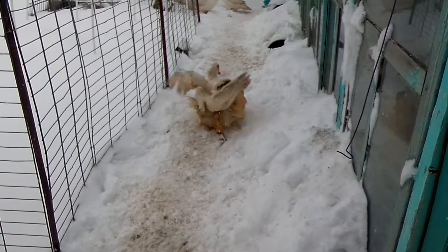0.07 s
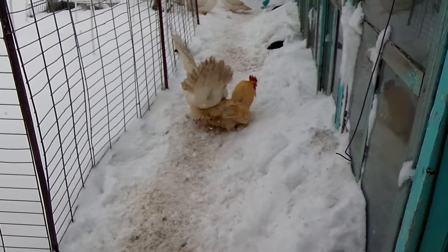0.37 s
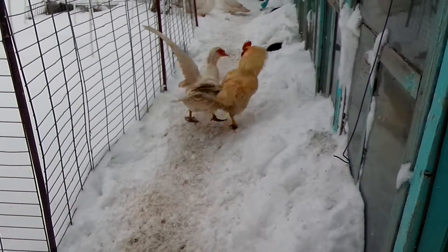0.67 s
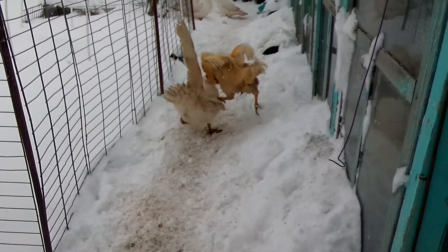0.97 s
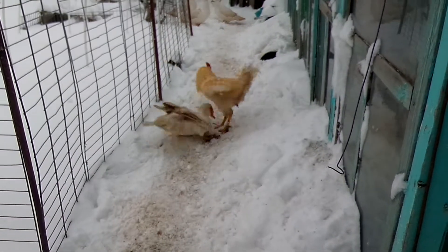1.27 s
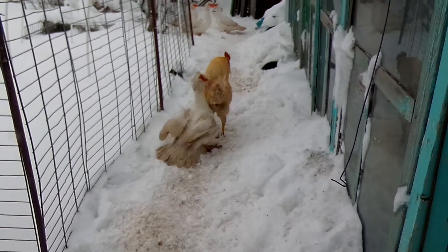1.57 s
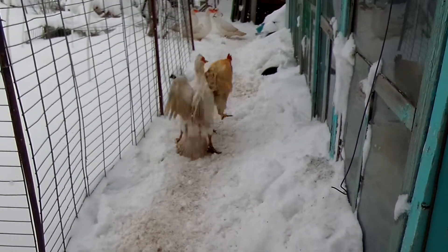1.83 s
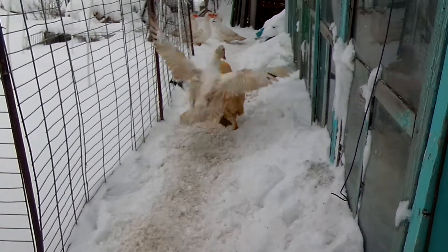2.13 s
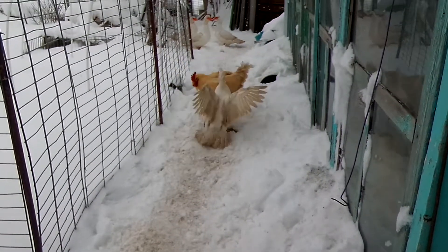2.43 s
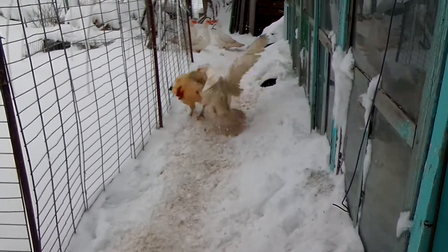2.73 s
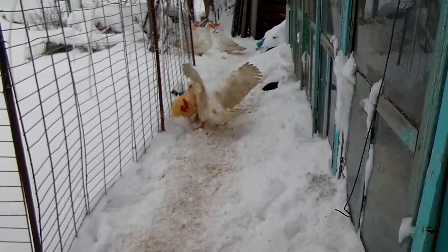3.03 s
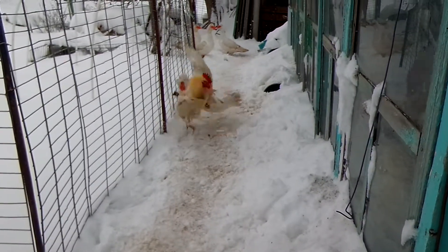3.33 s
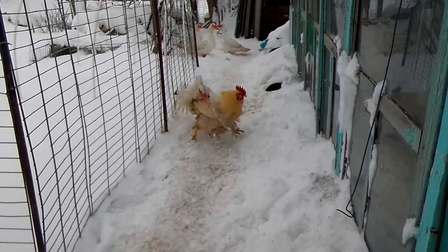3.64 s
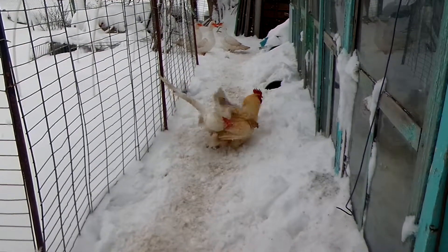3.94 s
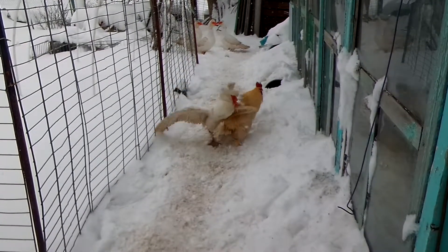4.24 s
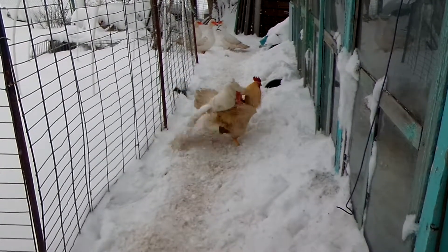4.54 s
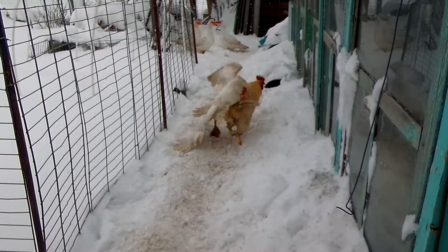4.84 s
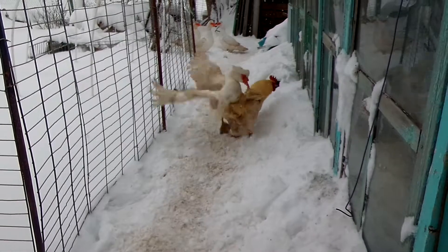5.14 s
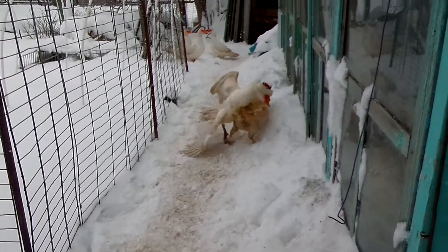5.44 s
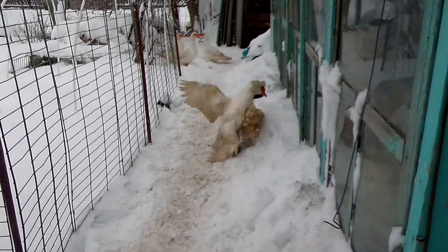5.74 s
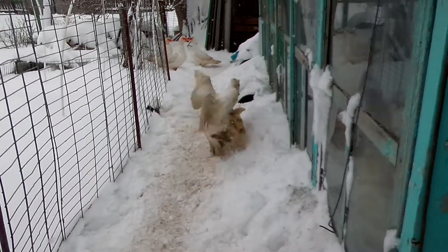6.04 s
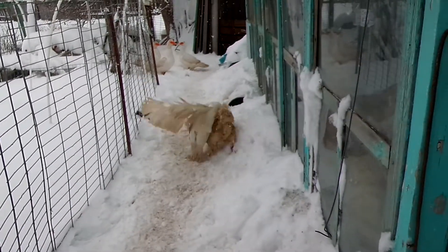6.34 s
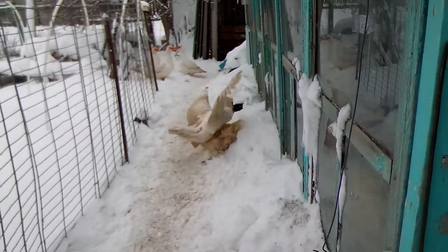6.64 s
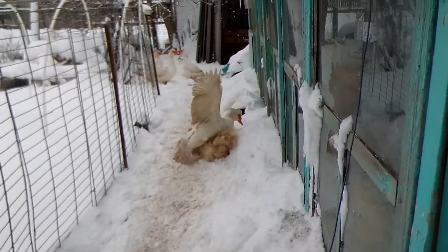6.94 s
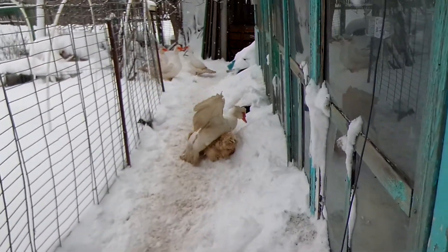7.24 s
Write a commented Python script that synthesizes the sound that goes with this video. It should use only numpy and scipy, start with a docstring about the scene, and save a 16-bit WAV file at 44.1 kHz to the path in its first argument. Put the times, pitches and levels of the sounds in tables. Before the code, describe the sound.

A drake and a rooster scuffle on snow, wings flapping and slapping, stiff feathers snapping and rustling in uneven bursts.

```python
"""A drake and a rooster fight on packed snow in a narrow pen, between a wire fence and a shed.
A first light blow breaks the near silence of the winter yard; feet stamp and the drake hisses softly.
From about 2 s the bouts come fast: stiff quills rake and snap across the other bird, wings land with
dull slaps and pushes of air, and feathers rustle and snow crunches in between. A deep handling rumble
swells near 6 s, the last hit falls as a soft distant wash rises, and the drake gives one more hiss."""
import sys
import numpy as np
from scipy import signal
from scipy.fft import rfft, irfft
from scipy.io import wavfile
from scipy.ndimage import uniform_filter1d

SR = 44100
rng = np.random.default_rng(int(sys.argv[2]) if len(sys.argv) > 2 else 0)


def bounce(signal):
    """Save signal as a 16-bit WAV file at the path given by the first command-line argument."""
    frames = np.transpose(np.atleast_2d(signal))
    limited = np.clip(frames, -1, 1)
    pcm = np.round(limited * 32767).astype(np.int16)
    wavfile.write(sys.argv[1], SR, pcm)


N = 330750
TIME = np.arange(N) / SR

# Quills raking a body: t/s, attack/s, release start/s, level/dB, rate/(quills/s),
# vane hiss re the clicks/dB, tilt/(dB/octave), shaft resonance f/Hz, its boost/dB
QUILL_RAKES = [(0.064, 0.004, .010, -39, 750, -2, 0, 5700, 3.5),
               (1.871, 0.0038, 0.045, -31, 237, 0, -0.5, 1540, 2.5),
               (2.089, .001, 0.036, -32.5, 240, 6, -1.25, 6060, 5.5),
               (2.592, .001, 0.0041, -46, 390, 1, 3, 2000, 17),
               (3.362, 0.0063, 0.027, -43, 200, 6, 3.5, 2850, 16.5),
               (3.686, 0.0036, 0.025, -53.5, 142, -8, -8, 2640, 12),
               (3.774, .008, 0.072, -50.5, 210, 3, 0, 2800, 12),
               (4.011, 0.022, 0.047, -30.5, 483, -1.5, 1.5, 4670, 3),
               (4.067, .002, 0.033, -49, 250, 10, -2.5, 1550, -14),
               (4.371, 0.04, 0.036, -44, 247, -22, 4.5, 1090, 9),
               (4.805, .014, 0.028, -50.5, 280, 0, 1, 5700, 3),
               (5.094, 0.012, 0.041, -30, 300, -3, -1, 4070, 0.5),
               (6.4418, 0.001, 0.0024, -37.5, 660, -6, 0.5, 2570, 25)]
# Single quills and claws snapping: t/s, peak/dB, shaft resonance f/Hz, its boost/dB
QUILL_SNAPS = [(1.9048, -15, 5000, 0), (1.9136, -18, 4000, 10.5), (1.951, -25, 8000, 2),
               (2.0197, -17.5, 5730, 15.5), (2.022, -13, 6500, 10), (2.09, -19, 4000, 18),
               (2.1183, -26, 6000, 2), (2.356, -42.5, 7600, 5), (2.576, -32, 2500, 17),
               (2.7105, -40.5, 5540, 13), (2.9252, -47, 6030, 6), (3.064, -43, 7700, 8),
               (3.342, -32, 5500, 3), (3.353, -22, 5400, 2.5), (3.375, -24.5, 4060, 12.5),
               (3.3944, -26.5, 5500, 4), (3.409, -32, 3000, 4), (3.4288, -33.5, 5500, -7),
               (3.532, -37.5, 6040, -2), (3.5933, -37, 2960, 26), (3.688, -29.5, 7460, 9),
               (3.7136, -25.5, 2800, -8), (3.737, -34, 5500, 9), (3.791, -28.5, 4500, 15),
               (3.868, -39, 6040, 2), (3.963, -39, 5000, -1), (4.049, -16.5, 5000, -2),
               (4.0834, -23, 9100, 12), (4.1025, -22.5, 4500, 5), (4.362, -32, 5000, -3),
               (4.388, -27, 5700, 4), (4.838, -35.5, 5660, 0), (5.0924, -24, 4450, 6),
               (5.14, -33, 9000, -2.5), (6.4464, -21, 5900, 9.5)]
# Wings landing on a body: t/s, level/dB, t60/s, knock f/Hz, its boost/dB
WING_SLAPS = [(.067, -51, 0.1, 980, 31), (0.071, -60.5, 0.27, 241, 33), (1.98, -48.5, 0.41, 400, -5),
              (2.022, -31.5, 0.038, 470, 10), (2.161, -45, 0.18, 405, -1), (2.5759, -33, 0.04, 840, 13.5),
              (2.595, -37.5, 0.044, 1220, 8), (2.711, -42.5, 0.074, 206, 9), (2.748, -49, 0.062, 1190, 10),
              (2.792, -39.5, 0.029, 230, 9.5), (3.079, -40, 0.034, 222, 0), (3.797, -38.5, 0.037, 1400, 4),
              (4.059, -26, 0.033, 1320, 13.5), (4.066, -36.5, 0.061, 197, 11),
              (4.399, -36.5, 0.063, 580, -9), (4.410, -30.5, 0.041, 1070, 10),
              (4.816, -38.5, 0.044, 442, 7.5), (4.8373, -35, 0.059, 388, -9), (5.027, -51, 0.27, 700, 0),
              (5.112, -33, 0.079, 342, 24), (6.052, -47.5, 0.25, 500, 13), (6.235, -48, 0.13, 700, -5),
              (6.26, -48, 0.16, 403, 2), (6.444, -34, 0.11, 1100, 0)]
# Feet stamping on packed snow: t/s, level/dB, knock f/Hz
STAMPS = [(0.203, -50.5, 1030), (.721, -56.5, 400), (0.817, -59, 607), (.884, -62, 553), (.98, -61, 1010),
          (1.491, -61, 1080), (2.255, -47, 347), (2.438, -57.5, 400), (2.652, -46.5, 450),
          (3.512, -51.5, 460), (3.962, -53, 806), (5.709, -52, 290), (5.851, -53.5, 1280),
          (6.765, -52, 198)]
# Wing strokes: t/s, air push level/dB, push f/Hz, swish level/dB, rustle level/dB
WING_STROKES = [(0.676, -44.5, 32.6, -67, -74), (1.905, -40, 85.5, -52, -57), (2.03, -39, 52.7, -50, -51),
                (2.115, -44.5, 54, -54.5, -47), (2.258, -43, 88, -60, -64), (2.608, -40, 77, -51, -52.5),
                (2.716, -39.5, 68, -51.5, -57), (2.794, -41, 95, -65, -55.5), (3.085, -40.5, 55, -62, -69),
                (3.391, -59, 102, -53, -47.5), (3.6, -52, 95.5, -54.5, -59.5), (3.785, -48, 90, -61.5, -67),
                (4.07, -35.5, 89, -46, -47.5), (4.422, -31.5, 84, -53, -59), (4.847, -32, 80.4, -50.5, -57),
                (5.127, -31.5, 183, -52, -55), (5.948, -54, 85.5, -55, -59),
                (6.056, -37, 80.4, -45.5, -55.5), (6.138, -50, 50, -61, -60), (6.263, -42, 70, -51, -58.5),
                (6.445, -33, 76, -50, -62)]
# Plumage brushing plumage: t/s, level/dB, half length/s
PLUMAGE_BRUSHES = [(0.095, -60.5, 0.022), (.19, -69, 0.025), (0.485, -73, 0.032), (1.135, -71.5, 0.0088),
                   (1.296, -67, 0.012), (1.6, -69.5, .01), (1.784, -57.5, 0.058), (2.284, -64.5, 0.054),
                   (2.65, -61, 0.017), (3.116, -61, 0.027), (3.416, -56, .01), (3.533, -61, 0.036),
                   (3.703, -52, 0.045), (3.821, -54.5, 0.042), (4.32, -58.5, 0.0087), (4.393, -50.5, 0.018),
                   (5.055, -66, 0.045), (5.303, -64.5, .025), (5.43, -60, 0.026), (5.661, -58, 0.052),
                   (6.767, -71, .03), (7.49, -73, 0.018)]
# Feet scraping the snow crust: t/s, level/dB, half length/s
SNOW_SCRAPES = [(2.94, -71.5, 0.081), (3.72, -53, 0.036), (3.834, -56.5, 0.041), (6.08, -70.5, 0.25)]
# The drake's hisses: centre t/s, half length/s, level/dB, formant scale/ratio, glide/(octaves/s),
# tilt/(dB/octave)
DRAKE_HISSES = [(0.253, 0.06, -68, 1.1, 1.8, -1), (1.057, 0.03, -71, 1.3, 0.46, 1),
                (1.767, 0.047, -55, 1, -.2, 2), (7.214, 0.054, -66, 1, .3, -0.5)]
# Resonances of throat and bill: f/Hz, width/Hz, level/dB
THROAT_FORMANTS = [(857, 220, 3), (1246, 160, -2.5), (1610, 110, -7.5), (2500, 500, -13.5),
                   (3000, 180, -12), (3584, 160, -10)]
# Reflections off snow, fence post and shed: delay/s, level/dB
EARLY_ECHOES = [(.0019, -19.5), (.0026, -35), (.0055, -29.5), (0.0096, -30)]
# Reverb time of the pen: f/Hz, t60/s
PEN_DECAY = [(100, 0.35), (500, 0.22), (2000, 0.29), (6000, 0.22), (14000, 0.27)]

# Level rides: t/s, level/dB
JOSTLE_RIDE = [(0, -66), (.3, -83), (.68, -71.5), (1.2, -84), (1.62, -73), (2.48, -86), (2.88, -71),
               (4.2, -69), (4.65, -72.5), (4.95, -65), (5.5, -74), (6.3, -66.5), (6.95, -83.5)]  # bodies rubbing between strokes
RUMBLE_RIDE = [(0, -60.5), (1.1, -65.5), (2.9, -60), (4.65, -69), (6.15, -54), (6.95, -64.5)]  # deep handling rumble, swelling near 6 s
WASH_RIDE = [(0, -73.5), (.9, -82), (5.2, -77), (6.5, -66.5), (6.9, -72.5), (7.25, -67.5)]  # distant wash

# EQ curves: f/Hz, level/dB
QUILL_EQ = [(40, -13), (150, -4), (400, -4.5), (750, -6), (1520, -1), (2220, -3.5), (3300, -3), (4870, 1),
            (6020, 2), (6840, -5), (8830, 0), (11400, -16.5), (15000, -21.5)]  # bright, stiff shafts
FEATHER_EQ = [(40, -4.5), (200, 5.5), (700, 2), (1500, 2.5), (2100, 0), (2800, 3.5), (3500, -4),
              (5800, 3.5), (6900, -2.5), (9000, -2), (11400, -16), (15000, -20)]  # sliding feathers, also the snow crunch
SLAP_EQ = [(30, -9), (120, 8.5), (450, 1), (800, -4), (1400, -5.5), (2200, -8.5), (3000, -14), (6000, -15),
           (15000, -44)]  # dull, padded blows
SWISH_EQ = [(25, -2.5), (90, 11), (200, 3.5), (480, -10), (800, -7.5), (1400, -11.5), (3000, -17.5),
            (6000, -21.5), (15000, -64.5)]  # low swish of a wing
YARD_EQ = [(12, -30), (20, -3), (49, 5.5), (98, -14.5), (284, -25.5), (443, -18), (655, -26), (1020, -25),
           (3040, -28.5), (4630, -36), (8790, -33), (11300, -39), (14500, -41), (15800, -44)]  # outdoor air
RUMBLE_EQ = [(10, -12.5), (28, -2.5), (40, -2), (60, -10.5), (100, -22.5), (200, -25), (800, -59)]  # deep handling rumble
WASH_EQ = [(100, -5), (400, -7), (750, 0), (1200, -4), (1800, -9.5), (3000, -18.5), (6000, -31),
           (15000, -54)]  # soft, midrange wash


def rakes(release_s=0.0082, jitter=0.25, spread_db=5, quills=100):
    """A wing's quills slip off in a quick uneven row, each at its own pitch, while their vanes hiss."""
    out, t = np.zeros(N), np.arange(SR // 5) / SR
    for s, attack, release_at, db, rate, hiss_db, tilt_db, hz, boost_db in QUILL_RAKES:
        gaps, sizes = rng.standard_normal((2, quills))
        onsets = (np.cumsum(np.exp(jitter * gaps)) - 1) / rate
        gains = amp(spread_db * np.clip(sizes, -2, 1))
        pitches = np.exp(rng.uniform(np.log(900), np.log(10000), quills))
        clicks = np.zeros(len(t))
        for onset, gain, pitch in zip(onsets, gains, pitches):
            add(clicks, onset, gain * resonance(quill_click(chatter_s=0.0012), pitch, boost_db=7, q=4))
        envelope = np.clip(t / attack, 0, 1) * np.exp(-np.maximum(t - release_at, 0) / release_s)
        clicks /= np.sqrt(np.average(clicks ** 2, weights=envelope ** 2))
        vanes = amp(hiss_db) * rng.standard_normal(len(t))
        drive = envelope * (clicks + vanes) / np.hypot(1, amp(hiss_db))
        add(out, s, amp(db) * resonance(eq(drive, QUILL_EQ, tilt_db), hz, boost_db, q=9))
    return out


def snaps():
    """Lone quills and claws flick free with a sharp, briefly ringing tick."""
    out, body = np.zeros(N), impulse_response(QUILL_EQ, tilt_db=-0.6)
    for s, db, hz, boost_db in QUILL_SNAPS:
        click = np.convolve(quill_click(chatter_s=0.002), body)
        snap = resonance(click, hz, boost_db, q=10)
        add(out, s, amp(db) * snap / abs(snap).max())
    return out


def quill_click(chatter_s, chatter=0.16, size=400):
    """A sharp release followed by a brief chatter of barbs."""
    click = chatter * rng.standard_normal(size) * np.exp(-np.arange(size) / SR / chatter_s)
    click[0] += 1
    return click * rng.choice([-1, 1])


def slaps_and_stamps(attack_s=0.001, contact_s=0.00026, stamp_t60_s=0.039, stamp_boost_db=12.5):
    """Padded blows of wings and feet: a contact transient, then a dull burst with a hollow knock."""
    out, t = np.zeros(N), np.arange(SR // 4) / SR
    stamps = [(s, db, stamp_t60_s, hz, stamp_boost_db) for s, db, hz in STAMPS]
    for s, db, t60, hz, boost_db in WING_SLAPS + stamps:
        envelope = (1 - np.exp(-t / attack_s)) * amp(-60 * t / t60)
        contact = 2 * (1 - t / contact_s) * np.exp(-t / contact_s)
        thud = eq(contact + envelope * rng.standard_normal(len(t)), SLAP_EQ)
        blow = resonance(thud, hz, boost_db, q=4)
        add(out, s, amp(db) * blow * np.linalg.norm(envelope) / np.linalg.norm(blow))
    return out


def flaps(build_cycles=0.2, fade_cycles=0.58, steepen=0.36, slowing=0.068, swish_half_s=0.021):
    """Each stroke sucks, then pushes the air in a steep-fronted wave, inside a soft feather swish."""
    out, t = np.zeros(N), np.arange(-SR // 8, SR // 8) / SR
    for s, push_db, hz, swish_db, _ in WING_STROKES:
        cycles = hz * t
        phase = 2 * np.pi * cycles / (1 + slowing * abs(cycles))
        width = np.where(t < 0, build_cycles, fade_cycles)
        push = np.sin(phase + steepen * np.sin(phase)) / np.cosh(np.clip(cycles / width, -20, 20))
        swish = eq(rng.standard_normal(len(t)), SWISH_EQ) / np.cosh(t / swish_half_s)
        add(out, s + t[0], amp(push_db) * push + amp(swish_db) * swish)
    return out


def rustle(grains_per_s=700, spread_db=4, flutter_db=1.64, flicks_per_s=14):
    """Feathers slide with a fine hiss; barbs and snow crystals crackle, and the odd small quill flicks."""
    grains = (rng.random(N) < grains_per_s / SR) * amp(spread_db * np.minimum(rng.exponential(1, N), 4))
    grains *= rng.choice([-1, 1], N)
    flutter = amp(flutter_db * wobble(N, 500))
    flicks = (rng.random(N) < flicks_per_s / SR) * rng.choice([-1, 1], N)
    texture = rng.standard_normal(N) + 0.41 * unit(grains) + 0.13 * unit(flicks)
    return eq(unit(flutter * texture) * rubbing(), FEATHER_EQ)


def rubbing(stroke_half_s=0.021, settle_db=-15.5, settle_s=0.034):
    """The rustle's envelope: feathers slide on strokes and brushes, settle after rakes, and jostle."""
    strokes = [amp(db) * swell(s, stroke_half_s) for s, *_, db in WING_STROKES]
    brushes = [amp(db) * swell(s, half) for s, db, half in PLUMAGE_BRUSHES]
    settling = []
    for s, _, release_at, db, *_ in QUILL_RAKES:
        age = TIME - s - release_at
        settling.append(amp(db + settle_db) * (age > 0) * np.exp(-abs(age) / settle_s))
    return power_sum(strokes + brushes + settling + [ride(JOSTLE_RIDE)])


def snow_crunch(grains_per_s=260, spread_db=5, bands=12, treading_db=-85.5):
    """Ice grains break in tiny pitched ticks under scraping feet and constant light treading."""
    grains, per_band = np.zeros(N), int(grains_per_s * N / SR / bands)
    for hz in np.geomspace(1100, 9000, bands):
        ticks = np.zeros(N)
        gains = amp(spread_db * np.minimum(rng.exponential(1, per_band), 3))
        ticks[rng.integers(N, size=per_band)] = gains
        grains += resonance(ticks, hz, boost_db=10, q=5)
    scrapes = [amp(db) * swell(s, half) for s, db, half in SNOW_SCRAPES]
    return power_sum([amp(treading_db)] + scrapes) * unit(eq(grains, FEATHER_EQ))


def hisses(rasp_db=0.5, wander=0.0349):
    """The drake's voiceless, rasping breath excites throat formants that slide as the bill opens."""
    out, t = np.zeros(N), np.arange(-SR // 4, SR // 4) / SR
    for s, half, db, scale, glide, tilt_db in DRAKE_HISSES:
        rasp = amp(rasp_db * wobble(len(t), 256))
        slide = scale * 2 ** (glide * t) * (1 + wander * wobble(len(t), 1024))
        breath = np.zeros(len(t))
        for hz, width, formant_db in THROAT_FORMANTS:
            lowpass = signal.butter(2, width / 2, fs=SR, output="sos")
            turbulence = signal.sosfilt(lowpass, rng.standard_normal((len(t), 2)) @ [1, 1j])
            carrier = np.exp(2j * np.pi * np.cumsum(hz * slide) / SR)
            breath += amp(formant_db + tilt_db * np.log2(hz / 1000)) * (turbulence * carrier).real
        envelope = np.exp(-(t / half) ** 2 / 2)
        add(out, s + t[0], amp(db) * unit(breath * rasp) * envelope)
    return out


def early_echoes(x):
    """Adds the first reflections from surfaces right beside the birds."""
    out = x.copy()
    for delay, db in EARLY_ECHOES:
        add(out, delay, amp(db) * x)
    return out


def pen_reverb(x, wet_db=-17, predelay_s=0.0028, echoes_per_s=4000):
    """Shed wall and fence scatter a short, weak tail; snow swallows the rest."""
    taps = rng.standard_normal(SR // 2) * (rng.random(SR // 2) < echoes_per_s / SR)
    hz, t, spectrum = signal.stft(taps, SR, nperseg=256)
    decay = amp(-60 * t / lookup(PEN_DECAY, hz)[:, None])
    tail = signal.istft(spectrum * decay, SR, nperseg=256)[1]
    tail *= np.clip(np.arange(len(tail)) / SR / predelay_s - 1, 0, 1)
    return x + amp(wet_db) * signal.fftconvolve(x, tail / np.linalg.norm(tail))[:N]


def yard(air_db=-72, low_cut_hz=90, eddy_db=-23.5, eddy_half_s=0.08):
    """A faint bed of outdoor air and a deep handling rumble; each wing stroke's eddy adds to the lows."""
    low_cut = signal.butter(2, low_cut_hz, "high", fs=SR, output="sos")
    air = amp(air_db) * unit(signal.sosfilt(low_cut, noise(YARD_EQ)))
    eddies = [amp(db + eddy_db) * swell(s, eddy_half_s) for s, db, *_ in WING_STROKES]
    return air + power_sum([ride(RUMBLE_RIDE)] + eddies) * noise(RUMBLE_EQ)


def distant_wash():
    """A soft, far-off wash that swells late."""
    return ride(WASH_RIDE) * noise(WASH_EQ)


def amp(db):
    """Decibels to gain."""
    return 10 ** (np.asarray(db) / 20)


def unit(x):
    """Scales to an rms of one."""
    return x / np.sqrt(np.mean(x ** 2) + 1e-20)


def ride(rows):
    """Gain over time from rows of t/s, level/dB."""
    return amp(np.interp(TIME, *np.transpose(rows)))


def swell(s, half):
    """Envelope that builds to its peak at time s and dies away."""
    return 1 / np.cosh(np.clip((TIME - s) / half, -30, 30))


def wobble(size, smoothing):
    """Random modulation of unit rms, smoothed over a number of samples."""
    return unit(uniform_filter1d(rng.standard_normal(size), smoothing))


def power_sum(gains):
    """Combined gain of independent noises."""
    return np.sqrt(sum(gain ** 2 for gain in gains))


def add(mix, s, sound):
    """Mixes a sound in at time s."""
    part = mix[max(round(s * SR), 0):][:len(sound)]
    part += sound[:len(part)]


def lookup(points, hz):
    """Reads a table on a logarithmic frequency axis."""
    f, value = np.transpose(points)
    return np.interp(np.log(hz + 1), np.log(f), value)


def impulse_response(points, tilt_db, size=2048):
    """Minimum-phase, unit-energy response of an EQ curve, tilted by tilt_db per octave above 500 Hz."""
    hz = np.fft.rfftfreq(size, 1 / SR)
    log_gain = np.log(amp(lookup(points, hz) + tilt_db * np.log2(np.maximum(hz, 500))))
    mirrored = np.r_[log_gain, log_gain[-2:0:-1]]
    response = np.fft.ifft(np.exp(np.conj(signal.hilbert(mirrored)))).real[:size // 2]
    return response / np.linalg.norm(response)


def eq(x, points, tilt_db=0):
    """Colours x with an EQ curve."""
    return signal.oaconvolve(x, impulse_response(points, tilt_db))[:len(x)]


def resonance(x, hz, boost_db, q):
    """Boosts or cuts a narrow band around hz; the energy stays the same."""
    b, a = signal.iirpeak(hz, q, fs=SR)
    out = x + (amp(boost_db) - 1) * signal.lfilter(b, a, x)
    return out * np.linalg.norm(x) / np.linalg.norm(out)


def noise(points):
    """Steady noise shaped by an EQ curve."""
    gain = amp(lookup(points, np.fft.rfftfreq(N, 1 / SR)))
    return unit(irfft(rfft(rng.standard_normal(N)) * gain, N))


def scene():
    """Both birds in the pen, over the quiet yard, in mono."""
    birds = rakes() + snaps() + slaps_and_stamps() + rustle() + snow_crunch() + hisses()
    fight = pen_reverb(early_echoes(birds) + flaps())
    return (fight + yard() + distant_wash())[None]


def record(dry, high_cut_hz=15850):
    """A steep high cut on the whole mix."""
    high_cut = signal.firwin(511, high_cut_hz, window=("kaiser", 9), fs=SR)
    return signal.oaconvolve(dry, high_cut[None], "same")


dry = scene()
out = record(dry)
bounce(out)
```